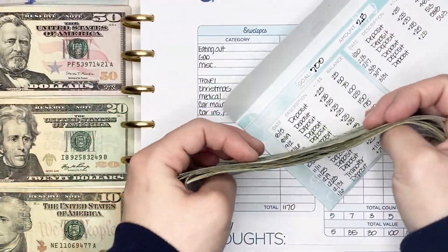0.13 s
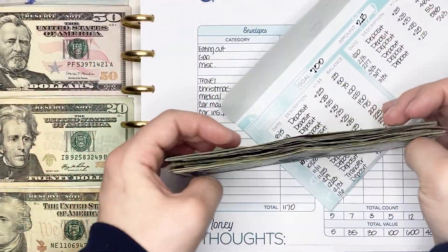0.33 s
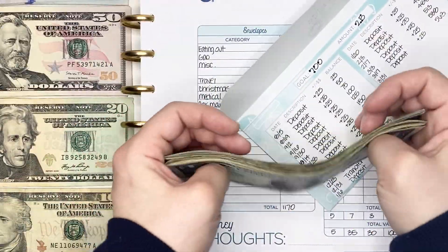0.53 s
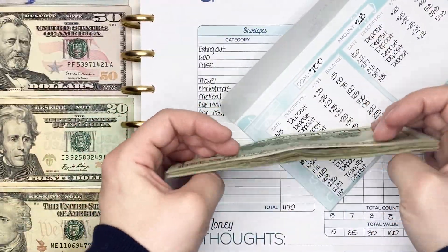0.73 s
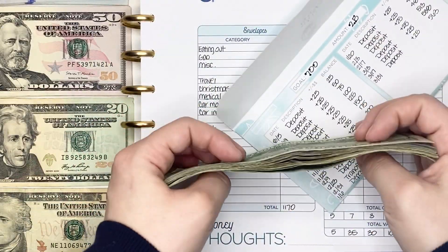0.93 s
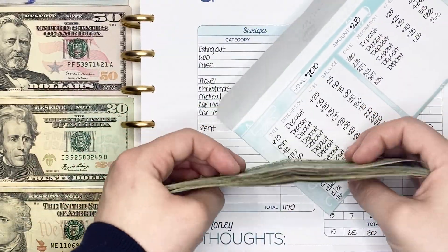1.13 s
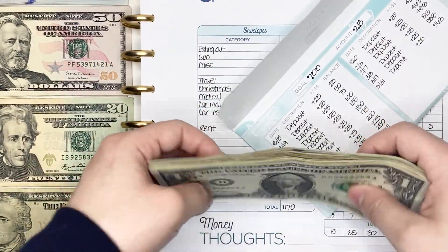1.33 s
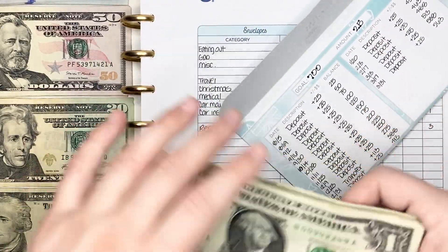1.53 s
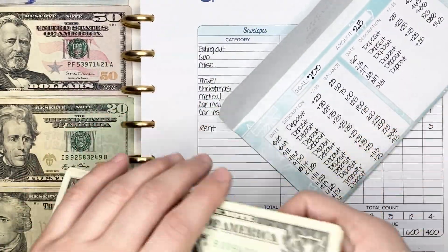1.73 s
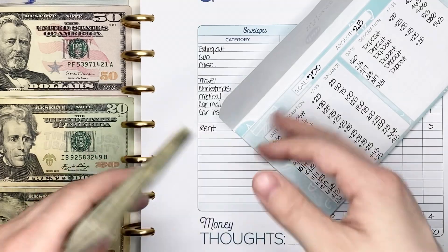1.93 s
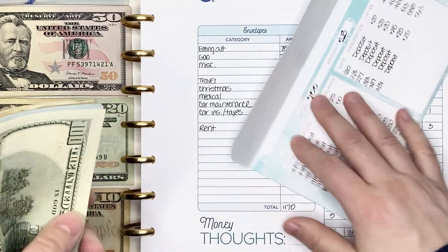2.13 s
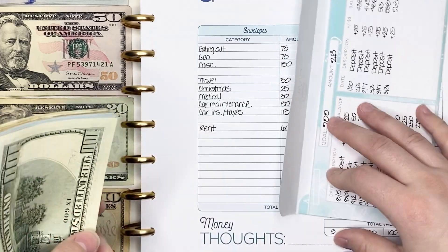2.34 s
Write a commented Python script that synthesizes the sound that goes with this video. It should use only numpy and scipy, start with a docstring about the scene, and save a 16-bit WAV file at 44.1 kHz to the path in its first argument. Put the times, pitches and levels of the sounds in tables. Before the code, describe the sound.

A stack of paper bills is knocked on a desk at about 0.3, 0.7 and 1.1 seconds, the first loudest. Each knock is a short crackle of edges and a thud, with soft slides and ticks between. Around 1.7 seconds the bills snap and rustle lightly as they change hands. From about 2.1 seconds an envelope swishes across a page. Everything is close, in a small room.

```python
"""A stack of paper bills is knocked square on a desk three times, close up, in a small room.
Each time the loose edges crackle down, then the stack lands and the desk thuds.
Between knocks the bills slide and tick. Then the stack is passed to one hand and an
envelope is pushed across a page. The moving hands stir the air."""
import sys
import numpy as np
from scipy import signal
from scipy.fft import rfft, irfft
from scipy.io import wavfile

SR = 44100
rng = np.random.default_rng(int(sys.argv[2]) if len(sys.argv) > 2 else 0)


def generate_wav(signal):
    """Clip the signal to [-1, 1] and save it as 16-bit WAV at the path in sys.argv[1]."""
    frames = np.transpose(np.atleast_2d(signal))
    scaled = np.clip(frames, -1, 1) * 32767
    pcm = np.round(scaled).astype(np.int16)
    wavfile.write(sys.argv[1], SR, pcm)


N = 105222

# stack knocks: touch_s, edge_db, edge_tilt_db_per_oct, land_delay_s, land_db, hold_s, desk_db, slap_db
KNOCKS = [(0.3115, -28.5, 0.3, 0.014, -17.5, 0.0014, -29.5, -26),
          (0.7075, -34.5, 1, 0.016, -22.5, 0.0025, -31.5, -32.5),
          (1.1050, -35, -1.5, 0.0102, -30, .005, -28, -40.5)]
# crisp paper spectrum: freq_hz, level_db
CRISP_SPECTRUM = [(200, -2), (1200, 1.5), (3000, -10.5), (5500, -2.5), (10000, -7.5), (13500, -6.5),
                  (16000, -15)]
BINS_HZ = np.maximum(np.fft.rfftfreq(4096, 1 / SR), 1)


def amp(db):
    """Decibels to gain."""
    return 10 ** (np.asarray(db) / 20)


def unit(x):
    """Scale to rms 1."""
    return x / np.sqrt(np.mean(x ** 2) + 1e-20)


def read(points, hz=BINS_HZ):
    """Interpolate a curve over log frequency."""
    freq_hz, value = np.transpose(points)
    return np.interp(np.log(hz + .5), np.log(freq_hz), value)


def add(mix, start_s, sound):
    """Mix in a sound, cropped to fit."""
    at = round(start_s * SR)
    sound = sound[max(-at, 0):]
    part = mix[max(at, 0):][:len(sound)]
    part += sound[:len(part)]


def tilted(points, db_per_oct):
    """Spectrum in dB, tilted above 300 Hz."""
    return read(points) + db_per_oct * np.log2(np.maximum(BINS_HZ, 300))


def hump(centre_hz, width_oct):
    """Broad resonance, in dB."""
    return -20 * np.log10(1 + (np.log2(BINS_HZ / centre_hz) / width_oct) ** 2)


def colour(x, spectrum_db):
    """Minimum-phase filter of unit energy."""
    cepstrum = irfft(np.log(amp(np.maximum(spectrum_db, spectrum_db.max() - 90))))
    half = len(cepstrum) // 2
    cepstrum[1:half] *= 2
    cepstrum[half + 1:] = 0
    impulse = irfft(np.exp(rfft(cepstrum)))
    return signal.fftconvolve(x, impulse / np.linalg.norm(impulse))


def steady(points, level_db):
    """Steady shaped noise."""
    gain = amp(read(points, np.fft.rfftfreq(N, 1 / SR)))
    return amp(level_db) * unit(irfft(rfft(rng.standard_normal(N)) * gain, N))


def grains(count, per_s, spread_db):
    """Impulses of random size, sign and time, rms 1."""
    size = amp(spread_db * np.minimum(rng.exponential(1, count), 4))
    return unit(size * rng.choice([-1, 1], count) * (rng.random(count) < per_s / SR))


def crush(rise_s, fade_s, hold_s=0):
    """Dense burst of crushed fibres."""
    t = np.arange(4096) / SR
    envelope = np.minimum(t / rise_s, 1) * np.exp(-np.maximum(t - rise_s - hold_s, 0) / fade_s)
    x = envelope * rng.choice([-1, 1], len(t))
    for _ in range(4):  # flatten the spectrum, restore the envelope
        white = irfft(np.exp(1j * np.angle(rfft(x))))
        x = envelope * np.sqrt(2) * np.cos(np.angle(signal.hilbert(white)))
    return x


def friction(length_s, peak_frac=.5, roughness=0.4):
    """Fibre slips swell and ease off, with judder and occasional larger catches."""
    judder_db, judder_step_s = 2.5, 0.00976
    count = int(length_s * SR)
    n = np.arange(count)
    swell = np.sin(np.interp(n / count, [0, peak_frac, 1], [0, np.pi / 2, np.pi])) ** 0.82
    judder = np.interp(n / SR / judder_step_s, np.arange(256), rng.standard_normal(256))
    slips = grains(SR, per_s=9000, spread_db=1.5)
    catches = roughness * amp(-11) * grains(SR, per_s=250, spread_db=6.1)
    return swell * amp(roughness * judder_db * judder) * (slips + catches)[:count]


def paper_slides(mix):
    """Paper drags over paper."""
    # strokes: start_s, length_s, level_db, tilt_db_per_oct, peak_frac, roughness
    slides = [(-.04, 0.18, -48, -1.9, 0.45, 0.85), (0.196, 0.15, -62, -1.5, 0.4, .8),
              (0.414, 0.1, -49, -0.9, 0.71, .6), (0.648, .07, -62.5, -.5, 0.42, 0.9),
              (0.743, 0.064, -49.5, -2.5, 0.9, 1.23), (0.811, .1, -50, -1, 0.28, 0.8),
              (1.182, 0.063, -47.5, -2.7, 0.33, 0.8), (1.252, 0.12, -61, 1, 0.23, 1.1),
              (1.328, 0.23, -64.5, 0.5, 0.37, 0.85), (1.56, .18, -60, 0.5, 0.37, 1.1),
              (1.767, 0.11, -55, 3, 0.56, 0.84), (1.965, 0.14, -58.5, -2.5, 0.53, 0.65),
              (2.055, 0.22, -44.5, 2, 0.42, 0.07), (2.206, 0.2, -56.5, -2, 0.42, 0.65)]
    # sliding paper spectrum: freq_hz, level_db
    spectrum = [(80, 4.5), (300, -2.5), (470, 2), (830, -7.5), (1170, 2), (2000, 1), (2450, -2.5),
                (3200, 3.5), (4200, -0.5), (5200, 3.5), (7500, 1), (10300, 4), (13500, -1.5), (16000, -8.5)]
    for start_s, length_s, level_db, tilt_db_per_oct, peak_frac, roughness in slides:
        slips = friction(length_s, peak_frac, roughness)
        add(mix, start_s, amp(level_db) * colour(slips, tilted(spectrum, tilt_db_per_oct)))


def room_floor():
    """Quiet rumble and hiss."""
    # background spectrum: freq_hz, level_db
    spectrum = [(20, 0.5), (35, -2.5), (60, -10.5), (100, -25), (200, -33), (500, -37.5), (900, -44.5),
                (3000, -50), (10000, -50.5), (16000, -55)]
    return steady(spectrum, level_db=-44.5)


def stirred_air():
    """Hands stir the air; the falling stack pushes a slow puff ahead of each knock."""
    # draught spectrum: freq_hz, level_db
    spectrum = [(1, -8), (3, -2), (5.5, 2.5), (10, -16), (20, -20), (40, -53), (300, -150)]
    puff_db, lead_s, width_s = -19.5, 0.022, 0.018
    t = np.arange(N) / SR
    puffs = sum(np.exp(-((t - touch_s + lead_s) / width_s) ** 2) for touch_s, *_ in KNOCKS)
    return steady(spectrum, level_db=-24) + amp(puff_db) * puffs


def bill_snaps(mix):
    """Single bills snap: a resonant tick plus a crisp burst."""
    # snaps: start_s, level_db, pitch_hz, fade_s, crisp_rel_db
    snaps = [(0.094, -47.5, 1200, 0.0059, 4.5), (0.3796, -41.5, 1240, 0.0033, -0.5),
             (0.5197, -44.5, 1090, 0.0024, -27), (0.531, -48.5, 1150, 0.0051, -9.5),
             (0.5642, -45.5, 1610, 0.0015, -1.5), (1.177, -45.5, 8800, 0.00085, -1),
             (1.248, -49.5, 2920, 0.0044, 6.5), (1.294, -45.5, 7800, 0.0028, -6),
             (1.301, -55, 1350, 0.0015, 9), (1.576, -58, 1360, 0.01, 6), (1.7201, -41, 1900, 0.0021, -4.5),
             (1.731, -50.5, 2000, 0.0066, 4.5), (1.755, -47, 1540, 0.0043, -21),
             (1.786, -41, 1100, 0.0042, -13), (1.836, -49.5, 1420, 0.011, -4.5),
             (2.034, -58.5, 1190, 0.01, 8.5)]
    body_rise_s, crisp_rise_s = 0.0019, 0.0046
    for start_s, level_db, pitch_hz, fade_s, crisp_rel_db in snaps:
        body = colour(crush(body_rise_s, fade_s), hump(pitch_hz, width_oct=0.64))
        crisp = colour(crush(crisp_rise_s, fade_s), read(CRISP_SPECTRUM))
        add(mix, start_s, amp(level_db) * body)
        add(mix, start_s - crisp_rise_s / 2, amp(level_db + crisp_rel_db) * crisp)


def hand_rubs(mix):
    """Fingertips and palm rub or crease the paper."""
    # rubs: start_s, length_s, level_db, pitch_hz, width_oct
    rubs = [(0.102, 0.2, -56.5, 484, 0.82), (1.195, .036, -46, 4070, 0.84), (1.73, .18, -38, 39, .36),
            (2.052, 0.012, -44, 507, .69), (2.068, .014, -45, 730, 0.61), (2.082, 0.012, -47, 970, .4)]
    for start_s, length_s, level_db, pitch_hz, width_oct in rubs:
        add(mix, start_s, amp(level_db) * colour(friction(length_s), hump(pitch_hz, width_oct)))


def stack_knocks(mix):
    """Loose edges crackle, the stack lands, the desk rings."""
    # loose edge spectrum: freq_hz, level_db
    edge_spectrum = [(60, -21), (200, -4.5), (290, 0), (410, 6), (830, -12), (1130, 1.5), (2000, -5),
                     (2500, -12.5), (3700, -7.5), (5600, -7.5), (7300, -16), (9500, -12), (16000, -32.5)]
    # stack resonances, one row per knock as the grip changes: pairs of freq_hz, level_db
    grips = [
        [(200, 7), (470, -2), (950, -4), (1780, 0), (3250, -1), (5200, -6)],
        [(220, 2.5), (630, 2), (1170, 5), (1990, 2.5), (3200, -2.5), (4900, -10.5)],
        [(240, 4), (700, 0.5), (1100, 2), (1650, 0), (3000, -5), (4600, -14.5)],
    ]
    edge_fade_s, crackle_db, crackle_fade_s = 0.009, -6.5, 0.033
    land_rise_s, land_fade_s = 0.0009, 0.0017
    t = np.arange(SR // 4) / SR
    settle = np.exp(-(t / edge_fade_s) ** 2) + amp(crackle_db) * np.exp(-t / crackle_fade_s)
    for knock, resonances in zip(KNOCKS, grips):
        touch_s, edge_db, tilt_db_per_oct, delay_s, land_db, hold_s, desk_db, slap_db = knock
        edges = grains(len(t), per_s=3200, spread_db=-0.5) * settle
        add(mix, touch_s, amp(edge_db) * colour(edges, tilted(edge_spectrum, tilt_db_per_oct)))
        stack_power = sum(amp(db + hump(hz, width_oct=0.21)) ** 2 for hz, db in resonances)
        clack = colour(crush(land_rise_s, land_fade_s, hold_s), 10 * np.log10(stack_power))
        slap = colour(crush(land_rise_s, land_fade_s, hold_s), read(CRISP_SPECTRUM))
        land_s = touch_s + delay_s
        add(mix, land_s - land_rise_s / 2, amp(land_db) * clack + amp(slap_db) * slap)
        add(mix, land_s, amp(desk_db) * desk_ring())


def desk_ring():
    """The desk top rings after a sharp push."""
    # desk modes: freq_hz, level_db, t60_s
    modes = [(97, -1.5, 0.091), (128.2, 0.5, .11), (197.3, -11, 0.037), (432, -10, 0.089), (510, -9, 0.09)]
    push_s = 0.00063
    t = np.arange(SR // 4) / SR
    ring = sum(amp(db - 60 * t / t60_s) * np.sin(2 * np.pi * hz * t) for hz, db, t60_s in modes)
    return ring * (1 - np.exp(-t / push_s))


def finger_bumps(mix):
    """Dull bumps of fingers and stack."""
    # bumps: start_s, level_db, cutoff_hz, fade_s
    bumps = [(0.379, -41, 457, 0.0049), (0.968, -53, 400, 0.0077), (1.1053, -25, 432, 0.0016),
             (1.432, -51, 375, 0.0051), (1.759, -51.5, 151, 0.0105), (1.787, -46, 610, 0.0052),
             (1.914, -47, 170, 0.0044)]
    rise_s, low_cut_hz = 0.0019, 48
    highpass_db = -20 * np.log10(1 + (low_cut_hz / BINS_HZ) ** 2)
    for start_s, level_db, cutoff_hz, fade_s in bumps:
        lowpass_db = -16.9 * np.log10(1 + (BINS_HZ / cutoff_hz) ** 4)
        add(mix, start_s, amp(level_db) * colour(crush(rise_s, fade_s), lowpass_db + highpass_db))


def desk_thuds(mix):
    """Soft contacts excite mainly the low desk modes."""
    # thuds: start_s, level_db
    thuds = [(.779, -36.5), (1.827, -42.5), (2.222, -42.5)]
    contact_s = 0.006
    push = np.hanning(int(contact_s * SR))
    for start_s, level_db in thuds:
        add(mix, start_s, amp(level_db) * signal.fftconvolve(desk_ring(), push / push.sum()))


def room_reverb(x):
    """Quick reflections off the desk top, then a short tail."""
    # tail spectrum: freq_hz, level_db
    spectrum = [(80, -20), (450, -11), (900, -12.5), (5000, -20), (10000, -17.5), (15000, -13)]
    # tail decay: freq_hz, t60_s
    decay = [(600, 0.22), (3000, 0.25), (14000, 0.31)]
    near_db, near_fade_s = -10, 0.0051
    t = np.arange(SR // 2) / SR
    near = grains(len(t), per_s=2300, spread_db=1.3) * np.exp(-t / near_fade_s) * (t > .002)
    echoes = grains(len(t), per_s=6000, spread_db=0.93) * (t > .004)
    hz, frame_s, bands = signal.stft(echoes, SR, nperseg=256)
    t60_s = read(decay, hz)[:, None]
    bands *= amp(read(spectrum, hz)[:, None] - 60 * frame_s / t60_s)
    bands *= np.sqrt(2 * np.log(1000) / (t60_s * SR))  # offsets the energy gain of longer decays
    tail = signal.istft(bands, SR, nperseg=256)[1][:len(t)]
    return signal.fftconvolve(x, tail + amp(near_db) * near / np.linalg.norm(near))[:N]


def scene():
    """Paper and desk in the room, over background noise and stirred air; mono."""
    mix = np.zeros(N)
    for source in (paper_slides, bill_snaps, hand_rubs, stack_knocks, finger_bumps, desk_thuds):
        source(mix)
    return (mix + room_reverb(mix) + room_floor() + stirred_air())[None]


def record(dry):
    """Linear-phase band limit."""
    cutoff_hz = 16050
    taps = signal.firwin(401, cutoff_hz, window=("kaiser", 9), fs=SR)
    padded = np.pad(dry, ((0, 0), (len(taps) // 2,) * 2), "reflect")
    return signal.oaconvolve(padded, taps[None], "valid")


dry = scene()
out = record(dry)
generate_wav(out)
```